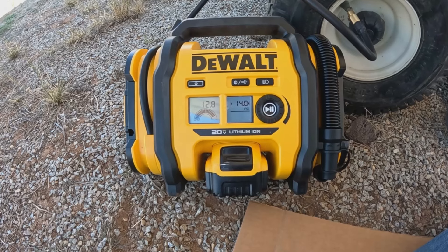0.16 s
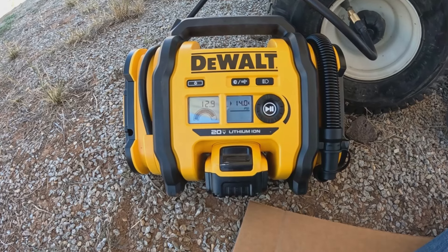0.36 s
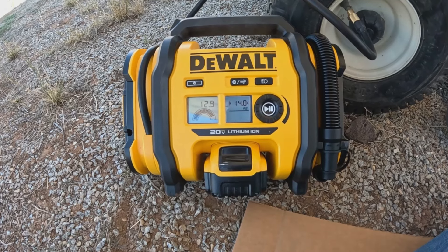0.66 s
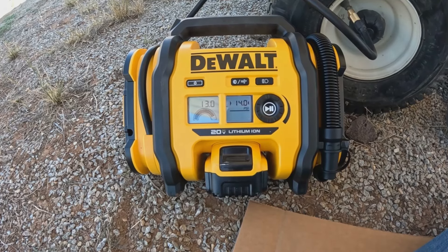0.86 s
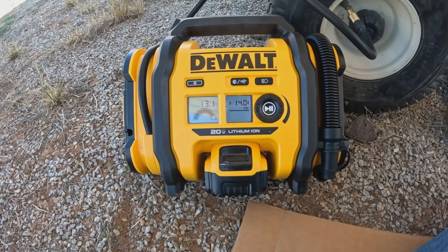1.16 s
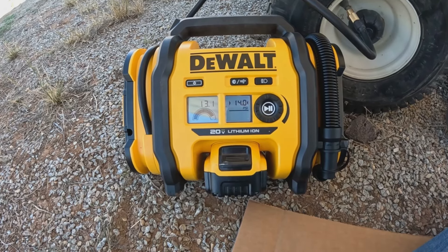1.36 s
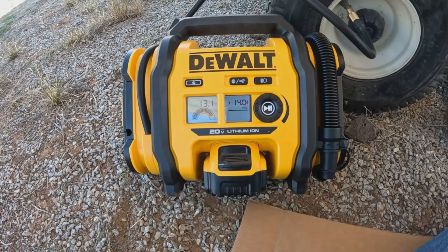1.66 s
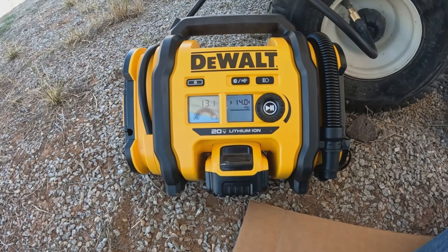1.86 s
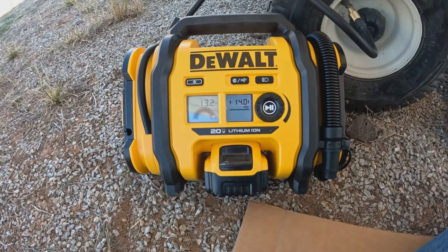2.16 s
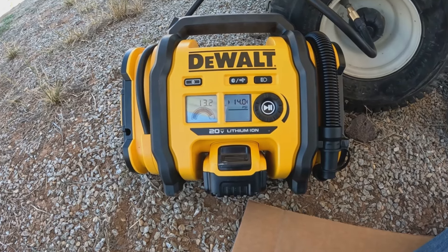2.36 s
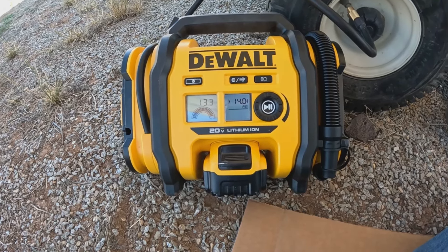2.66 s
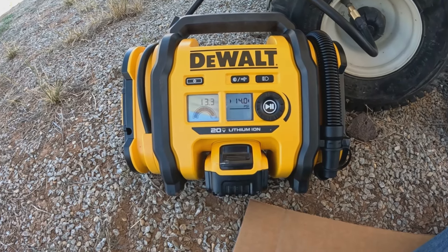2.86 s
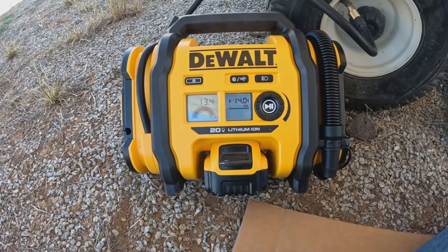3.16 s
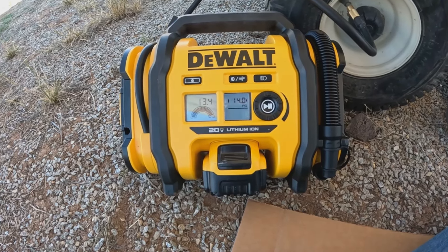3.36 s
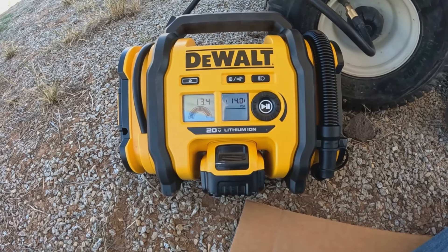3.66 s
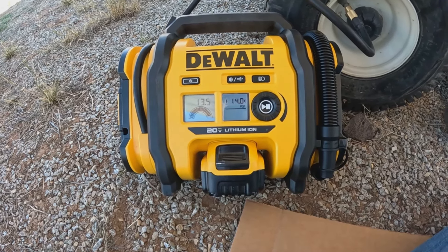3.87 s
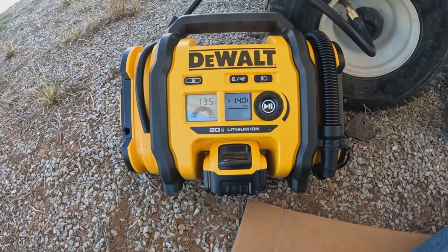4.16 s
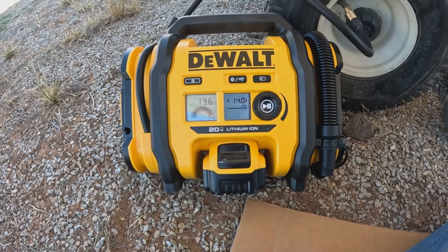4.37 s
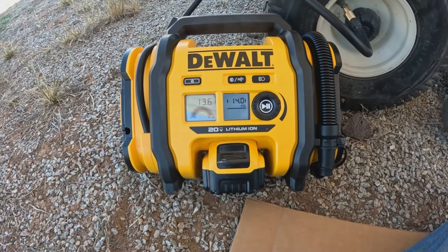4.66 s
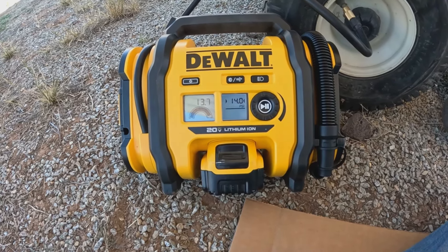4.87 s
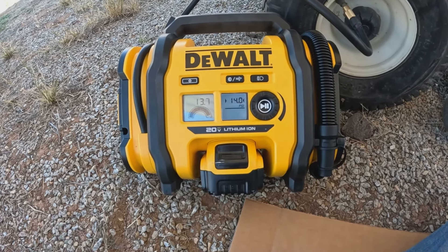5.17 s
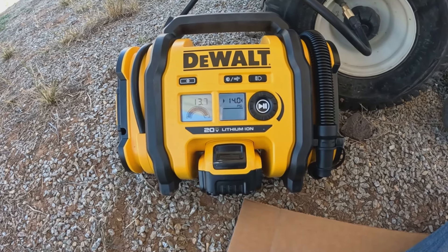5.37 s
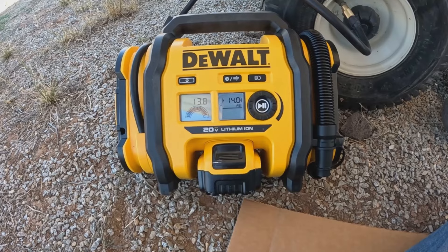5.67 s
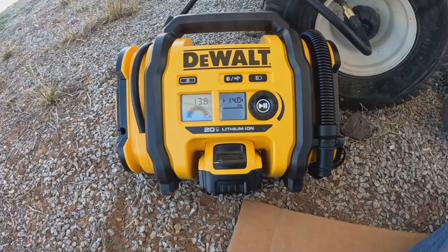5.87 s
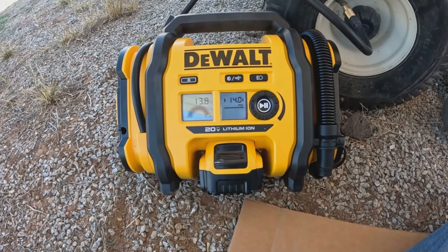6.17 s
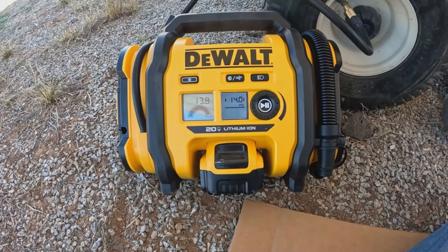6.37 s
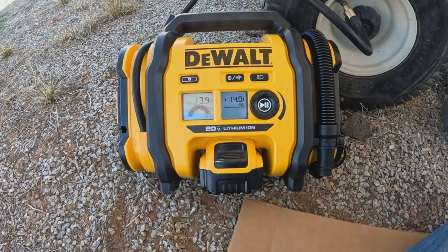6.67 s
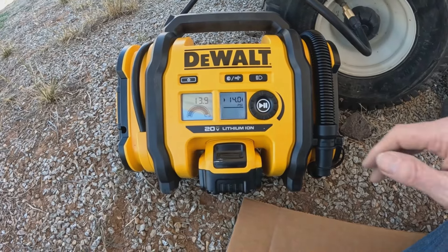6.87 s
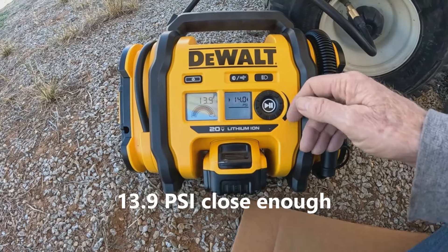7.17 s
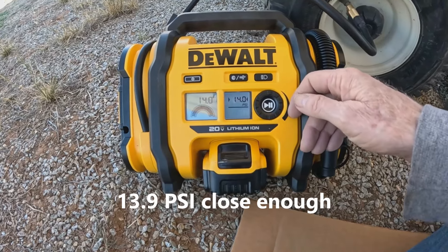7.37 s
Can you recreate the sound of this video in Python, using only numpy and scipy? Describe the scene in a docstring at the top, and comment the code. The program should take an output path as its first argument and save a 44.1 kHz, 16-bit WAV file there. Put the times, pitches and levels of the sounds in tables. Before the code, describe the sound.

A portable tire inflator runs right by the microphone in the open air: a harsh mid-pitched drone made of about thirty-seven strokes a second, with fluttering valve, metallic rattle and faint steady whistle. It holds constant for over six seconds, then stops suddenly with a short falling gear chatter and clunk. Faint outdoor air remains as a hand moves in, cloth swishing and fingers lightly ticking.

```python
"""On gravel outdoors, close to the microphone, a small cordless piston compressor pumps up a tire.
Its motor turns the crank through an 11:52 gear; every stroke sets a reed valve fluttering.
Gear noise is noise patterned by the turning teeth; whine and whistle are tones; air is coloured noise.
The power cuts, the crank coasts to a halt and rocks back, with a last gear clash and puffs of air.
Then a hand reaches in: a sleeve rubs, swishes and zips, and the fingers make a few light ticks."""
import sys
import numpy as np
from scipy import signal
from scipy.fft import rfft, irfft, next_fast_len
from scipy.io import wavfile
from scipy.ndimage import uniform_filter1d

SR = 44100
rng = np.random.default_rng(int(sys.argv[2]) if len(sys.argv) > 2 else 0)


def write(x):
    x = np.atleast_2d(x).T
    wavfile.write(sys.argv[1], SR, np.round(np.clip(x, -1, 1) * 32767).astype(np.int16))


N = 332073
T = np.arange(N) / SR  # time, s
HZ = np.fft.rfftfreq(next_fast_len(N + 8192), 1 / SR)  # frequencies of the colouring filter

# outdoor background colour: [pitch_hz, density_db_per_hz (relative)]
OUTDOORS = [(25, -5.5), (75, -3.5), (190, -1.5), (335, -10), (775, -14), (1660, -22), (4400, -26),
            (9000, -42.5), (13000, -51)]
# low bumps on the microphone: [start_s, pitch_hz, swell_s, level_db]
BUMPS = [(1.689, 62, 0.0092, -35), (2.738, 76, 0.0051, -14), (2.755, 48, 0.0078, -23)]
# strokes of the sleeve: [middle_s, half_length_s, rub_db, swish_db, zip_db]
SLEEVE_STROKES = [(6.802, 0.063, -63, -69, -90), (6.925, .04, -68, -67, -66), (7.139, .1, -58, -65.5, -90),
                  (7.394, .11, -54.5, -64.5, -67), (7.53, .03, -58, -74, -86)]
# dull rubbing of the sleeve: [pitch_hz, density_db_per_hz (relative)]
RUB_COLOUR = [(40, -24), (90, -2), (190, 5.5), (350, 2), (650, -10), (1500, -47)]
# light swish of the sleeve: [pitch_hz, density_db_per_hz (relative)]
SWISH_COLOUR = [(300, -6), (1000, 5), (2500, 0), (4500, -8.5), (5800, -15), (8000, -31), (13000, -36)]
# light ticks as the hand comes in: [peak_s, level_db (before the common trim)]
TICKS = [(7.076, -42), (7.086, -45), (7.144, -45.5), (7.317, -50)]
# cooling air colour: [pitch_hz, density_db_per_hz (relative)]
FAN_COLOUR = [(25, -27), (42, -23), (60, -25), (100, -3), (200, 10.5), (290, -9), (350, 26.5), (480, 1),
              (650, 15.5), (900, 3.5), (2000, -54)]
# the speed controller's whistle and its commutator sidebands: [pitch_hz, level_db (rms)]
WHISTLE = [(4942, -55.5), (5760, -77), (5981, -49), (6503, -77.5)]
# whining tones of the drive: [cycles_per_crank_turn, level_db (rms at running speed)]
WHINE_ORDERS = [(25, -42.5), (29, -42.5), (35, -49), (37, -59), (41, -49.5), (50, -45), (52, -46),
                (64, -51), (81, -53.5), (83, -44.5), (103, -45.5), (105, -45)]
# the slack gears clash as the drive coasts: [middle_s, mesh_tone_db]
GEAR_CLASHES = [(6.478, -24), (6.499, -22), (6.517, -15), (6.549, -21), (6.569, -22)]
# scrape of the unloaded teeth: [pitch_hz, density_db_per_hz (relative)]
SCRAPE_COLOUR = [(1200, -25), (2000, -8), (2550, -1), (3500, -9), (4500, -27), (9000, -50)]
# colour of the housing: [pitch_hz, density_db_per_hz (relative)]
HOUSING_COLOUR = [(120, -45.5), (280, -3.5), (800, -1.5), (1400, 2), (1700, -5), (2450, -1), (3250, -15.5),
                  (4150, -8.5), (4550, -19.5), (6200, -27.5), (7600, -28), (9000, -41.5), (10500, -39.5),
                  (12200, -42.5), (13600, -50.5)]
# ringing and dips of the housing: [pitch_hz, width_hz, lift_db]
HOUSING_PANELS = [(1240, 130, 1), (2977, 105, 16.5), (3040, 79, -9), (3375, 330, 9.5), (3695, 24, -4.5),
                  (3894, 81, 5.5), (5000, 84, 4), (5710, 280, 8), (7980, 240, -10), (9170, 400, -13),
                  (9500, 200, 10)]
# knocks of piston and rod in every turn: [crank_angle_turns, pitch_hz, t60_s, level_db]
KNOCKS = [(.03, 3005, 0.023, -24.5), (.17, 2339, 0.013, -20.5), (.2, 4250, 0.018, -28),
          (.42, 3456, 0.017, -23), (0.768, 3500, 0.02, -28), (.8, 1000, 0.012, -25)]
# last short tones as the piston halts and rocks back: first a gear clash near 1130 Hz, then puffs of air:
# [start_s, pitch_hz, swell_s, level_db]
LAST_TONES = [(6.606, 1130, 0.0073, -20.5), (6.63, 857, 0.015, -34), (6.679, 1367, 0.0092, -33),
              (6.682, 2950, 0.018, -51), (6.698, 1111, 0.018, -39), (6.714, 372, 0.011, -32),
              (6.745, 3450, .018, -63)]
# hiss of air in the valve slit: [pitch_hz, density_db_per_hz (relative)]
SLIT_COLOUR = [(1000, -12), (4200, 7.5), (5500, 2.5), (7500, -3.5), (9000, -20.5), (10500, -2), (12200, -7),
               (13600, -14)]
# what the flow sets ringing: [pitch_hz, level_db, swing_start_turns, flow_exponent]
VALVE_MODES = [(632.2, -11, 0.2214, 0.82), (361.3, -23, 0.1917, 0.39), (502.3, -31, 0.2055, 0.13)]

# gear teeth; crank speed under power, turns/s; time of the power cut, s; crank angle at the start, turns
WHEEL_TEETH, PINION_TEETH, RUN_SPEED, POWER_OFF_S, START_ANGLE = 52, 11, 36.6715, 6.44, .3965
# unpowered, the crank slows by drag (time constant, s) and dry friction (turns/s), after a short run-on (s)
DRAG_S, FRICTION_SPEED, RUN_ON_S = .2207, 11.2, .0065
# the last compression stalls the crank and the trapped air rocks it back (s, s, s, turns/s)
STALL_AT_S, BRAKE_S, ROCK_S, ROCK_SPEED = 6.671, .026, .15, 4.8
# half length of a clash, s; level of the steady mesh tone after the power cut, dB
CLASH_S, MESH_DB = .0057, -38.5
# the unloaded teeth scrape for a moment: middle, half length, level
SCRAPE_AT_S, SCRAPE_S, SCRAPE_DB = 6.515, .035, -29.5
# pitch of the cloth's weave at the slow ends of a stroke and at full speed
ZIP_SLOW_HZ, ZIP_FAST_HZ = 2310, 4500
# valve flow: crank angle of its peak, turns to open and to close, steepness of each flank
FLOW_PEAK, FLOW_OPEN, FLOW_CLOSE, OPEN_STEEP, CLOSE_STEEP = .35, .096, .16, 3.94, 2.96
BAND_EDGE_HZ = 13700


def amp(db):
    """Decibels to gain."""
    return 10 ** (np.asarray(db) / 20)


def unit(x):
    """Scales to rms 1."""
    return x / np.sqrt(np.mean(x ** 2) + 1e-20)


def noise():
    """White noise over the whole scene."""
    return rng.standard_normal(N)


def bell(at, middle, width):
    """A smooth rise and fall of height 1; width is the half length at 1/e."""
    return np.exp(-((at - middle) / width) ** 2)


def wander(per_s):
    """Smooth chance of rms 1 that changes about per_s times a second."""
    return unit(np.interp(T * per_s, np.arange(N), noise()))


def colour(x, spectrum, peaks=()):
    """Filters by a spectrum with bell-shaped peaks and dips; rms 1."""
    hz_points, db_points = np.transpose(spectrum)
    shape_db = np.interp(np.log(HZ + 1), np.log(hz_points), db_points)
    for hz, width_hz, lift_db in peaks:
        shape_db = shape_db + lift_db / (1 + (2 * (HZ - hz) / width_hz) ** 2)
    bass_cut = HZ ** 2 / (HZ ** 2 + 30 ** 2)
    spectrum_in = rfft(x, 2 * (len(HZ) - 1))
    return unit(irfft(spectrum_in * amp(shape_db) * bass_cut)[:N])


def swells(rows, jitter_s=0):
    """Short tones swell and die softly; jitter in time smears their pitch."""
    out = np.zeros(N)
    for start_s, hz, swell_s, db in rows:
        age = np.maximum(T - start_s, 0)
        envelope = (age / swell_s * np.exp(1 - age / swell_s)) ** 2
        swing = np.sin(2 * np.pi * hz * (age + jitter_s * wander(350)))
        out += amp(db) * envelope * swing
    return out


def outdoor_air(level_db=-61):
    """The open air murmurs steadily: coloured noise."""
    return amp(level_db) * colour(noise(), OUTDOORS)


def yard(x, wet_db=-24):
    """Faint scatter from the ground and things nearby: a decaying noise tail added to the sound."""
    t, t60_s = np.arange(SR // 2) / SR, .32
    decay = np.exp(-np.log(1000) * t / t60_s)
    tail = rng.standard_normal(len(t)) * decay * (t > .005)
    return x + amp(wet_db) * signal.oaconvolve(x, tail / np.linalg.norm(tail))[:N]


def hand(tick_t60_s=.064, tick_db=-8, grain_db=3):
    """A sleeve rubs and swishes in a few strokes, and the fingers make light ticks."""
    rub_level = sum(amp(db) * bell(T, s, half_s) for s, half_s, db, _, _ in SLEEVE_STROKES)
    swish_level = sum(amp(db) * bell(T, s, half_s) for s, half_s, _, db, _ in SLEEVE_STROKES)
    rub = colour(noise(), RUB_COLOUR) * rub_level
    swish = colour(noise(), SWISH_COLOUR) * swish_level * amp(grain_db * wander(98))
    taps = np.zeros(N)
    for s, db in TICKS:
        taps += amp(db) * (T >= s) * np.exp(-np.log(1000) * abs(T - s) / tick_t60_s)
    return rub + swish + amp(tick_db) * taps * colour(noise(), SWISH_COLOUR)


def sleeve_zip():
    """Threads of cloth skip over one another: a fuzzy hiss that rises with the speed of each stroke."""
    slide = np.max([bell(T, s, half_s) for s, half_s, *_ in SLEEVE_STROKES], axis=0)
    level = sum(amp(db) * bell(T, s, half_s) for s, half_s, _, _, db in SLEEVE_STROKES)
    hz = ZIP_SLOW_HZ + (ZIP_FAST_HZ - ZIP_SLOW_HZ) * slide
    phase = 2 * np.pi * np.cumsum(hz) / SR + 1.2 * wander(900)
    return level * wander(700) * np.sin(phase)


def crank_speed():
    """Turns a second: steady under power, then coasting, stalling and rocking back."""
    age = np.maximum(T - POWER_OFF_S - RUN_ON_S, 0)
    coast = (RUN_SPEED + FRICTION_SPEED) * np.exp(-age / DRAG_S) - FRICTION_SPEED
    brake = np.clip((STALL_AT_S - T) / BRAKE_S, 0, 1)
    rock_progress = np.clip((T - STALL_AT_S) / ROCK_S, 0, 1)
    rock = np.sin(np.pi * np.sqrt(rock_progress)) ** 2  # quick to start, slow to settle
    return coast * brake - ROCK_SPEED * rock


def fan(pace, level_db=-40):
    """Cooling air rushes with the motor's speed."""
    return amp(level_db) * colour(noise(), FAN_COLOUR) * pace ** 2


def whistle():
    """The switched motor current sings at a fixed pitch until the power cuts."""
    powered = np.clip((POWER_OFF_S - T) * 200, 0, 1)
    tones = sum(amp(db) * np.sin(2 * np.pi * hz * T) for hz, db in WHISTLE)
    return np.sqrt(2) * powered * tones


def whine(turns, pace, backlash_turns=.00076):
    """Tones locked to the crank, blurred by the play of the gears."""
    angle = turns + backlash_turns * wander(60)
    tones = np.zeros(N)
    for order, db in WHINE_ORDERS:
        tones += amp(db) * np.cos(2 * np.pi * (order * angle + rng.random()))
    return np.sqrt(2) * tones * pace ** 2


def gear_chatter(turns, pace, overtone_db=-12, rough=.27):
    """With the power off the teeth scrape and the mesh tone falls with the speed, flaring at each clash."""
    tooth = 2 * np.pi * WHEEL_TEETH * turns + .6 * wander(300)
    mesh = np.cos(tooth) + amp(overtone_db) * np.cos(2 * tooth)
    coasting = amp(MESH_DB) * pace * (T > POWER_OFF_S)
    clashing = sum(amp(db) * bell(T, s, CLASH_S) for s, db in GEAR_CLASHES)
    scrape = amp(SCRAPE_DB) * bell(T, SCRAPE_AT_S, SCRAPE_S) * colour(noise(), SCRAPE_COLOUR)
    return (mesh * (coasting + clashing) + scrape) * (1 + rough * wander(220))


def surface(turns, count=380, size=8192):
    """Roughness of a turning part: the same random bumps come round at every turn."""
    random_phases = np.exp(2j * np.pi * rng.random(count))
    bumps = irfft(np.r_[0, random_phases], size)
    return np.interp(turns % 1 * size, np.arange(size), unit(bumps))


def rattle(turns, pace, wheel_db=-2, pinion_db=-2.5, loose_db=-1.5, tooth_depth=.3, wobble_depth=.042,
           load_depth=.14, load_angle=.32, speed_power=.91, uneven_db=.52, level_db=-28):
    """Wheel and pinion scrape tooth by tooth, hardest under the stroke, and shake the housing."""
    motor_turns = turns * WHEEL_TEETH / PINION_TEETH
    rub = amp(wheel_db) * surface(turns) + amp(loose_db) * noise()
    # the pinion's flaws meet different wheel teeth at every turn
    flaws = sum(surface(motor_turns, count=80) * surface(turns, count=5) for _ in range(5))
    pinion = amp(pinion_db) * unit(flaws)
    teeth = 1 + tooth_depth * np.cos(2 * np.pi * WHEEL_TEETH * turns)
    # the teeth press harder under the stroke and once in every turn of the motor
    stroke_load = load_depth * np.cos(2 * np.pi * (turns - load_angle))
    motor_wobble = wobble_depth * np.cos(2 * np.pi * motor_turns)
    load = 1 + stroke_load + motor_wobble
    drive = (rub + pinion) * teeth * load * pace ** speed_power * amp(uneven_db * wander(30))
    return amp(level_db) * colour(drive, HOUSING_COLOUR, HOUSING_PANELS)


def knocks(turns, pace, rise_s=.00076, scatter=.25, play_s=.00005):
    """Piston and rod take up their play near fixed crank angles and ring the casing."""
    out, t = np.zeros(N), np.arange(SR // 20) / SR
    for angle, hz, t60_s, db in KNOCKS:
        at = np.flatnonzero(np.diff(np.floor(turns - angle)))  # samples where the crank passes the angle
        force, late = rng.standard_normal((300, 2))[:len(at)].T
        hit = np.clip(at + np.round(late * play_s * SR).astype(int), 0, N - 1)
        blows = np.zeros(N)
        blows[hit] = pace[at] * (1 + scatter * force)
        envelope = (1 - np.exp(-(t / rise_s) ** 2)) * np.exp(-np.log(1000) * t / t60_s)
        ring = amp(db) * envelope * np.sin(2 * np.pi * hz * t)
        out += signal.oaconvolve(blows, ring)[:N]
    return out


def push(turns, pace, angle=.2244, width=.059, level_db=-28):
    """The piston shoves the air out and back once a turn: a throb; the small case radiates no deep bass."""
    u = (turns % 1 - angle) / width
    shove = np.exp(-u ** 2 / 2) * np.cos(2 * u)
    bass_cut = signal.butter(5, 60, "high", fs=SR, output="sos")
    return amp(level_db) * signal.sosfilt(bass_cut, shove) * pace ** 2


def valve_hiss(turns, pace, angle=.31, width=.11, uneven_db=4.5, level_db=-54):
    """A short spit of air as the reed lifts, never twice the same."""
    lift = bell(turns % 1, angle, width)
    level = amp(level_db + uneven_db * wander(30))
    return level * lift * pace * colour(noise(), SLIT_COLOUR)


def air_flow(turns):
    """Flow through the valve (0-1): it opens quickly and closes slowly once a turn."""
    past = turns % 1 - FLOW_PEAK
    opening = abs(past / FLOW_OPEN) ** OPEN_STEEP
    closing = abs(past / FLOW_CLOSE) ** CLOSE_STEEP
    return 1 / (1 + np.where(past < 0, opening, closing))


def valve(turns, pace, speed_power=.95, unevenness=.0041, slack_rise=.15):
    """Each stroke starts the reed and air ducts swinging at their own pitch, for as long as air flows."""
    forward = np.maximum.accumulate(turns)  # holds still while the crank rocks back
    stroke = np.floor(forward).astype(int)
    strength = 1 + unevenness * rng.standard_normal(stroke.max() + 1)
    flow = abs(uniform_filter1d(air_flow(forward) * (turns >= forward), size=40))
    clock = np.cumsum(1 + slack_rise * (1 - pace)) / SR  # the pitch rises a little as the air slows
    shut = np.minimum(20 * np.sin(np.pi * forward) ** 2, 1)  # the valve closes between strokes
    out = np.zeros(N)
    for hz, db, angle, flow_power in VALVE_MODES:
        opened = np.interp(stroke + angle, forward, clock)
        out += amp(db) * flow ** flow_power * np.cos(2 * np.pi * hz * (clock - opened))
    return out * shut * strength[stroke] * pace ** speed_power


def scene():
    """The crank drives the pump and gears; hand, bumps and outdoor air join them."""
    speed = crank_speed()
    turns = START_ANGLE + np.cumsum(speed) / SR
    pace = abs(speed) / RUN_SPEED  # 1 at running speed
    drive = fan(pace) + whistle() + whine(turns, pace) + gear_chatter(turns, pace) + rattle(turns, pace)
    pump = knocks(turns, pace) + push(turns, pace) + valve_hiss(turns, pace) + valve(turns, pace)
    halt = swells(LAST_TONES, jitter_s=.00006)
    nearby = hand() + sleeve_zip() + swells(BUMPS)
    return (outdoor_air() + nearby + yard(drive + pump + halt))[None]


def record(dry):
    """A short fade-in and the recorder's band limit."""
    onset = np.sin(np.pi / 2 * np.minimum(T / .003, 1)) ** 2
    low_pass = signal.firwin(511, BAND_EDGE_HZ, window=("kaiser", 9), fs=SR)
    return signal.oaconvolve(dry * onset, low_pass[None], "same")


dry = scene()
out = record(dry)
write(out)
```